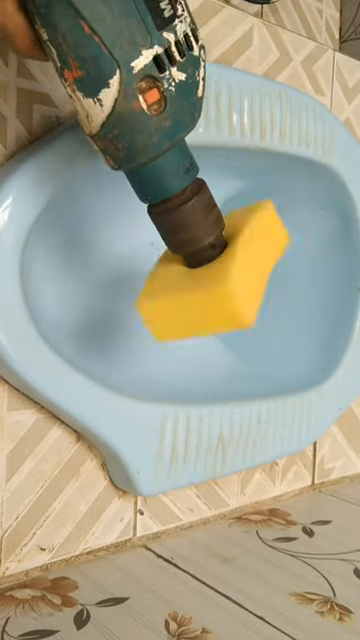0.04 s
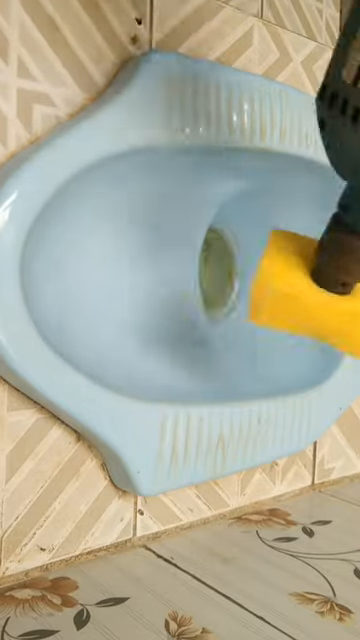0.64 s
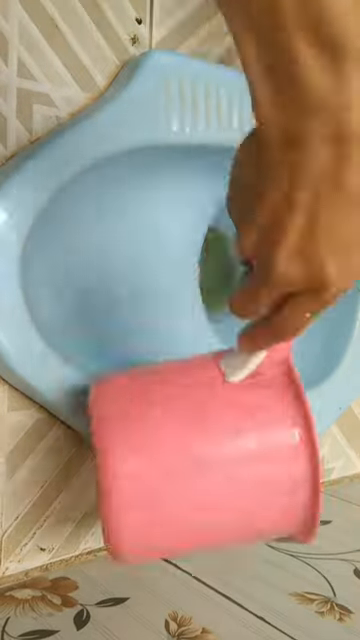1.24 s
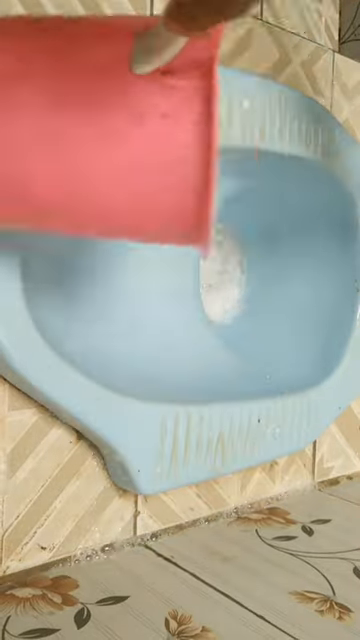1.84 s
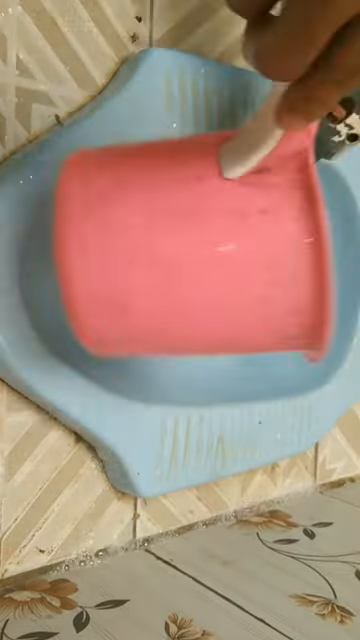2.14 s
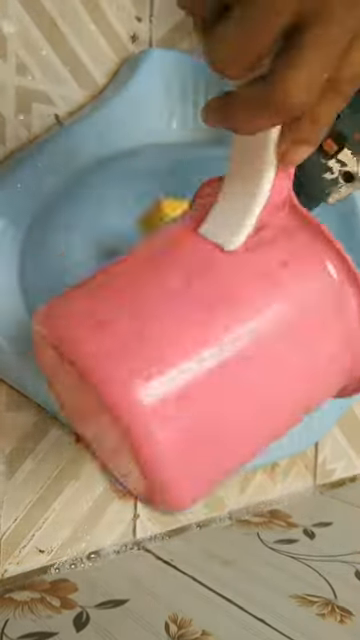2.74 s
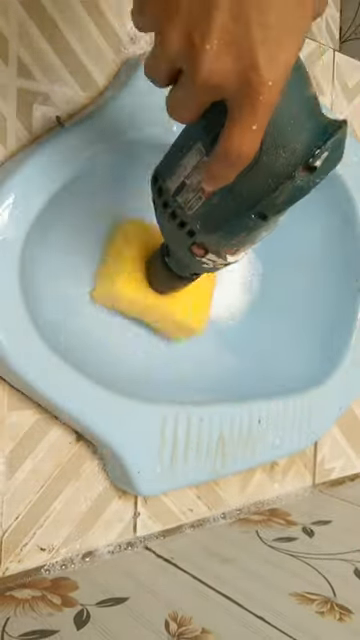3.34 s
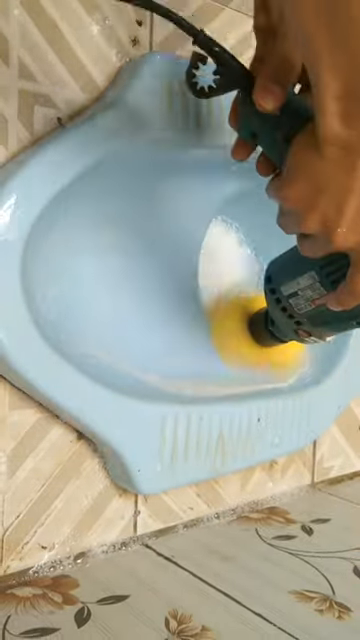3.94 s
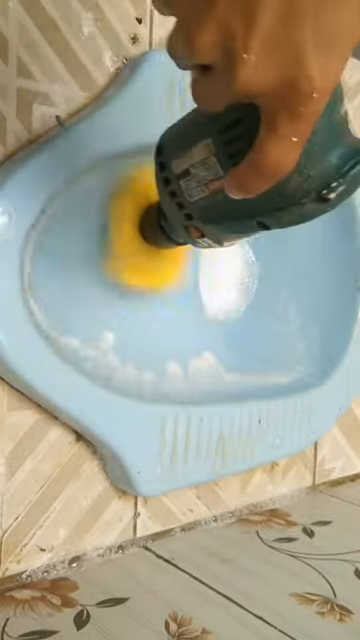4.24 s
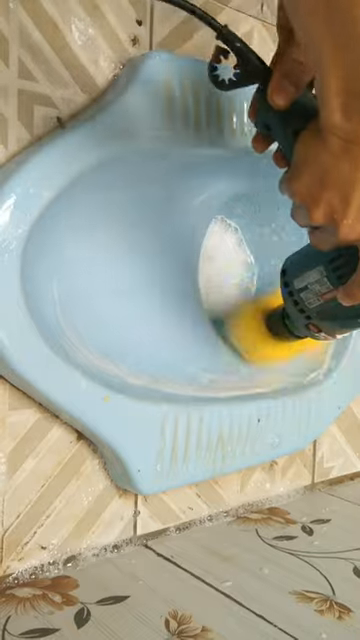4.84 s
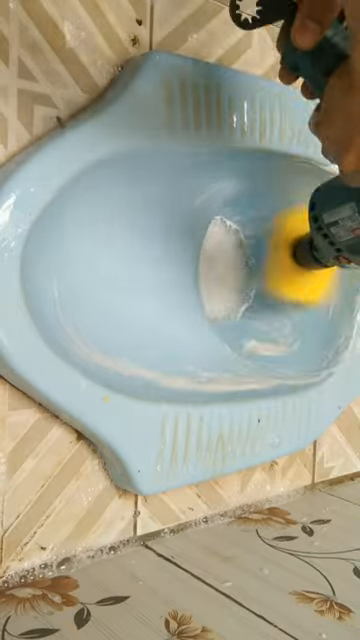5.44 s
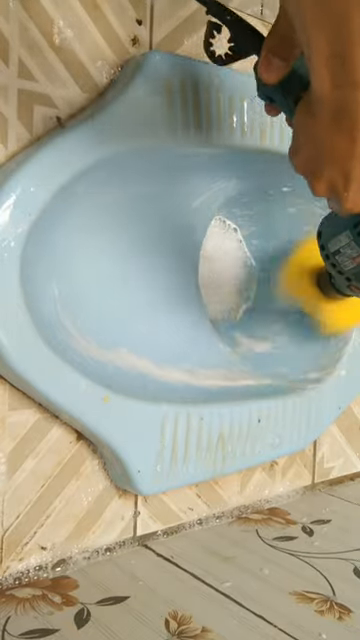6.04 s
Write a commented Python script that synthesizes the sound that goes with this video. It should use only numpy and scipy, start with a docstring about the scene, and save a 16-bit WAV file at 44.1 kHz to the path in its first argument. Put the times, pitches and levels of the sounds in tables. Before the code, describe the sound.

Close up in a small tiled bathroom, an electric drill whirs in brief bursts. A plastic scoop knocks lightly and throws small splashes of water and detergent into a porcelain toilet pan. The drill blips again, then runs continuously with a rattling, hissing whine that wavers in pitch. Its wet sponge rubs the glaze, with a gulp of water, sharp ticks and a few short squeaks.

```python
"""Drill scrubbing a toilet pan

An electric drill with a wet sponge on its chuck scrubs porcelain in a small tiled bathroom.
The trigger is blipped, and a plastic scoop knocks about and throws detergent and water into the pan.
Then the drill runs on: gears rattle and whine, brushes hiss, the sponge rubs and squeaks on the glaze."""
import sys
import numpy as np
from scipy import signal
from scipy.fft import rfft, irfft
from scipy.io import wavfile
from scipy.ndimage import uniform_filter1d

SR = 44100
rng = np.random.default_rng(int(sys.argv[2]) if len(sys.argv) > 2 else 0)


def materialize(psi):
    """Save the field psi as 16-bit PCM at rate SR to the path in sys.argv[1].

    A 1-D psi becomes a single channel; in a 2-D psi each row is a channel.
    """
    bounded = np.clip(np.atleast_2d(psi).T, -1, 1)
    quanta = np.round(bounded * 32767).astype(np.int16)
    wavfile.write(sys.argv[1], SR, quanta)


N = 273420
TIME = np.arange(N) / SR


def amp(db):
    """Decibels to gain."""
    return 10 ** (np.asarray(db) / 20)


def unit(x):
    """Scales to rms 1."""
    return x / np.sqrt(np.mean(x ** 2) + 1e-20)


def level_at(spectrum, hz):
    """Reads a spectrum's level in dB along a log-frequency axis."""
    points_hz, db = np.transpose(spectrum)
    return np.interp(np.log(hz + 1), np.log(points_hz + 1), db)


def add(mix, start, sound):
    """Mixes a sound in at a start time in seconds."""
    part = mix[round(start * SR):][:len(sound)]
    part += sound[:len(part)]


def colour(x, spectrum):
    """Shapes x with an EQ curve that falls away steeply past its ends; rms 1."""
    hz = np.fft.rfftfreq(len(x), 1 / SR) + 1
    skirts = np.minimum(1, hz / spectrum[0][0]) ** 4 * np.minimum(1, spectrum[-1][0] / hz) ** 8
    return unit(irfft(rfft(x) * amp(level_at(spectrum, hz)) * skirts, len(x)))


def wander(rate_hz):
    """Smooth random motion of rms 1, changing up to about rate_hz times a second."""
    hz = np.fft.rfftfreq(N, 1 / SR)[:4096]
    spectrum = rng.standard_normal(len(hz)) + 1j * rng.standard_normal(len(hz))
    return unit(irfft(spectrum * np.exp(-(hz / rate_hz) ** 2), N))


def grains(per_s, spread_db):
    """A random rain of tiny impacts, a few much larger than the rest."""
    size = amp(spread_db * np.minimum(rng.exponential(1, N), 4))
    return unit(size * rng.choice([-1, 1], N) * (rng.random(N) < per_s / SR))


def patchy(x, depth_db):
    """Lets the colour shift in brief patches, as the point of contact moves."""
    frames = signal.stft(x, nperseg=512, noverlap=384)[2]
    patches = uniform_filter1d(rng.standard_normal(frames.shape), size=5, axis=0)
    patches = unit(uniform_filter1d(patches, size=12, axis=1))
    return unit(signal.istft(frames * amp(depth_db * patches), nperseg=512, noverlap=384)[1][:N])


def envelope(start, rise, hold, sag_db_per_s, stop_db_per_s):
    """Rises from a soft start, sags while it is held, then dies quickly."""
    t = TIME - start
    fall_db = sag_db_per_s * np.clip(t - rise, 0, hold) + stop_db_per_s * np.clip(t - rise - hold, 0, 1)
    return np.clip(t / rise, 0, 1) ** 1.33 * amp(-fall_db)


# The room tone's colour. Each row: frequency in Hz, relative level in dB.
RUMBLE_SPECTRUM = [(20, -22), (55, -5), (95, 0), (145, -11), (220, -6), (320, -14), (580, -15), (800, -21),
                   (1150, -35), (3500, -37), (8000, -35), (10000, -48), (16000, -55)]
# Narrow noise bands of a thin ring. Each row: centre in Hz, width in Hz, level in dB before the swell.
RING_BANDS = [(4740, 74, -67), (4930, 67, -75.5), (5100, 100, -77)]
# The ring's slow swell. Each row: time in seconds, gain in dB.
RING_FADER = [(0, -4), (1.1, -3.5), (2.0, 2), (3.2, 0.5)]


def background(rumble_db=-68.5):
    """Low room rumble and a thin, fuzzy high ring."""
    ring = np.zeros(N)
    for hz, width, db in RING_BANDS:
        phase = 2 * np.pi * hz * TIME
        ring += amp(db) * (wander(width) * np.cos(phase) + wander(width) * np.sin(phase))
    swell = amp(np.interp(TIME, *np.transpose(RING_FADER)))
    return ring * swell + amp(rumble_db) * colour(rng.standard_normal(N), RUMBLE_SPECTRUM)


def room(x, t60=0.16, echoes_per_s=3000):
    """Dense, quickly dying reflections from the tiles."""
    t = TIME[:SR // 2]
    echoes = rng.choice([-1, 1], len(t)) * (rng.random(len(t)) < echoes_per_s / SR)
    tail = echoes * (t > .003) * amp(-60 * t / t60)
    return signal.fftconvolve(x, tail / np.linalg.norm(tail))[:N]


# Thumps and hums. Each row: start in seconds, length in seconds, level in dB, pitch in Hz, width in Hz.
THUMP_AND_HUM_CUES = [(0.058, 0.09, -55, 209, 18), (0.061, 0.052, -49.5, 510, 330),
                      (1.244, 0.025, -46, 236, 36), (1.247, 0.041, -53, 586, 31),
                      (2.513, .16, -54, 544, 51), (2.872, 0.041, -45.5, 191, 31),
                      (2.865, 0.07, -38, 577, 28), (2.867, 0.03, -49, 1780, 95),
                      (3.877, 0.091, -42, 633, 87), (3.548, 0.92, -57, 201, 68),
                      (4.271, 0.36, -51, 211, 25), (5.097, 0.19, -56.5, 144, 30),
                      (5.383, 0.31, -52, 442, 32)]


def thumps_and_hums():
    """Low thumps of the scoop and drill, and hums of the rubbed pan: noise held in one resonance."""
    out = np.zeros(N)
    for start, length, db, hz, width in THUMP_AND_HUM_CUES:
        n = int(length * SR)
        pole = np.exp((2j * hz - width) * np.pi / SR)
        drone = signal.lfilter([1], [1, -pole], rng.standard_normal(SR)).real
        drone = colour(drone, [(hz / 2, 0), (hz * 2, 0)])[-n:]
        add(out, start, amp(db) * unit(drone) * signal.windows.tukey(n, .5))
    return out


# Bubbles and gulps. Each row: start in seconds, level in dB, starting pitch in Hz, t60 in seconds.
BUBBLE_CUES = [(1.475, -42, 754, 0.019), (1.642, -33, 784, 0.0077), (1.792, -49.5, 1770, 0.037),
               (3.877, -30, 1370, 0.018), (3.926, -35, 596, 0.051), (3.945, -19.5, 600, 0.019)]


def bubbles(glide=0.97, attack_s=0.00053):
    """Air trapped in the water rings at one slightly rising pitch."""
    out, t = np.zeros(N), TIME[:8192]
    attack = 1 - np.exp(-(t / attack_s) ** 2)
    for start, db, hz, t60 in BUBBLE_CUES:
        tone = np.sin(2 * np.pi * hz * t * (1 + glide * t))
        add(out, start, amp(db - 60 * t / t60) * attack * tone)
    return out


# The hollow ring of a knock. Each row: frequency in Hz, relative level in dB, t60 in seconds.
HOLLOW_MODES = [(235, -12, .07), (285, -7, .06), (345, -8, .05), (441, -1, .05), (630, -8, .05),
                (748, -9, .045), (1384, -14, .026), (1782, -17, .03), (2853, -22, .022), (3262, -24, .018)]
# Knocks of the scoop and drill.
# Each row: start in seconds, strength in dB, pitch factor, contact time in seconds.
KNOCK_CUES = [(1.163, -46.5, 0.96, .002), (1.253, -38.5, 1.05, 0.0013), (1.262, -37.5, 0.93, 0.001),
              (2.144, -26, 0.99, 0.00014), (2.148, -32, 1.21, 0.00014), (2.875, -33.5, 0.83, 0.001),
              (2.889, -35, 1, 0.00051), (3.899, -38, 1.23, 0.00029), (4.7498, -31.5, 2.1, 0.00028)]


def knocks(low_cut_hz=205):
    """A blow rings the hollow modes; a longer contact is duller, and so small a body radiates no bass."""
    out, t = np.zeros(N), TIME[:8192]
    for start, db, pitch, contact in KNOCK_CUES:
        ring = sum(amp(mode_db - 60 * t / t60) * np.sin(2 * np.pi * hz * pitch * t)
                   for hz, mode_db, t60 in HOLLOW_MODES)
        push = np.exp(-2 * np.pi * t / contact) * t
        add(out, start, -amp(db) * signal.fftconvolve(ring, push / push.sum())[:len(t)])
    return signal.sosfilt(signal.butter(4, low_cut_hz, "high", fs=SR, output="sos"), out)


# Sharp ticks. Each row: start in seconds, level in dB, centre in Hz, t60 in seconds.
TICK_CUES = [(0.104, -33, 3000, .015), (0.488, -38, 6200, 0.071), (1.053, -51, 4970, 0.023),
             (1.137, -59, 5950, 0.021), (1.441, -43, 6430, .03), (1.254, -51, 6900, 0.018),
             (1.603, -39, 4740, 0.01), (1.632, -43, 4500, 0.038), (1.791, -41, 7400, 0.012),
             (2.285, -35.5, 5700, 0.023), (2.419, -36, 6000, .04), (2.468, -36.5, 6240, 0.023),
             (4.024, -26, 3500, 0.024), (4.046, -27.5, 4500, 0.071), (4.074, -25, 4000, .03),
             (4.325, -24, 3500, 0.014), (4.484, -25, 4000, .02), (4.7486, -15, 6500, 0.0021),
             (5.485, -31, 1920, 0.055)]


def ticks(half_width_octaves=0.58, top_hz=13000):
    """Drops and grit hit the glaze in short, bright bursts; the longer ones have a softer attack."""
    out, t = np.zeros(N), TIME[:4096]
    hz = np.fft.rfftfreq(len(t), 1 / SR) + 1
    for start, db, centre_hz, t60 in TICK_CUES:
        band = 1 / (1 + (np.log2(hz / centre_hz) / half_width_octaves) ** 4) / (1 + (hz / top_hz) ** 10)
        burst = unit(irfft(rfft(rng.standard_normal(len(t))) * band))
        attack = 1 - np.exp(-t / (.04 * t60))
        add(out, start, amp(db - 60 * t / t60) * attack * burst)
    return out


# Colours of the droplets, finest grains and bulk water. Each row: frequency in Hz, relative level in dB.
SPRAY_SPECTRUM = [(1290, -60), (2200, -2), (3080, 1), (3900, 5), (4860, 3.5), (5150, 2), (7870, 0.5),
                  (13000, -36), (15500, -34)]
FIZZ_SPECTRUM = [(4500, -2), (7800, 3), (10000, -5), (15500, -20)]
SLOSH_SPECTRUM = [(250, -49), (450, -3), (700, -3), (1200, 0), (1800, 2.5), (2600, -1), (3400, -4),
                  (5000, -39)]
# Water and powder thrown by the sponge and the scoop.
# Each row: start, rise and hold in seconds, then spray, slosh and fizz levels in dB.
THROW_CUES = [(0.467, 0.02, 0.18, -51, -58.5, -55), (0.686, 0.013, 0.0064, -59, -54, -71),
              (0.846, 0.027, 0.035, -43.5, -48.5, -53), (0.95, 0.012, 0.049, -65, -73, -71),
              (1.043, 0.025, .015, -62, -58, -76), (1.125, 0.014, 0.0055, -56.5, -63, -67),
              (1.23, 0.029, 0.066, -55.5, -65, -64), (1.415, 0.036, 0.062, -56, -66.5, -63.5),
              (1.588, 0.04, 0.058, -52.5, -61.5, -60), (1.781, 0.019, 0.039, -53, -69, -63),
              (1.919, 0.03, 0.036, -53, -65, -64), (2.067, 0.019, 0.08, -54, -69, -58.5),
              (2.269, 0.018, 0.017, -56, -85.5, -56.5), (2.405, 0.014, 0.048, -55.5, -73.5, -62),
              (2.514, 0.099, .04, -55.5, -53, -69), (2.715, 0.058, 0.062, -58, -73, -61.5)]


def splashes():
    """Each throw thins, then runs out; the low slosh settles sooner than the spray and its fizz."""
    spray = patchy(colour(grains(per_s=2200, spread_db=4.2), SPRAY_SPECTRUM), depth_db=2.6)
    fizz = patchy(colour(grains(per_s=1400, spread_db=4.8), FIZZ_SPECTRUM), depth_db=2.6)
    slosh = patchy(colour(grains(per_s=5000, spread_db=2.5), SLOSH_SPECTRUM), depth_db=1.5)
    out = np.zeros(N)
    for start, rise, hold, spray_db, slosh_db, fizz_db in THROW_CUES:
        droplets = amp(spray_db) * spray + amp(fizz_db) * fizz
        out += droplets * envelope(start, rise, hold, sag_db_per_s=123, stop_db_per_s=401)
        out += amp(slosh_db) * slosh * envelope(start, rise, hold, sag_db_per_s=122, stop_db_per_s=600)
    return out


# The colour of a squeak. Each row: frequency in Hz, relative level in dB.
SQUEAK_SPECTRUM = [(200, -21), (400, 1), (700, -9), (900, -4), (1350, -2), (1900, -0.5), (3000, -2),
                   (4500, -7.5), (7000, -16)]
# Squeaks. Each row: start in seconds, length in seconds, level in dB, first and last slip rate in Hz.
SQUEAK_CUES = [(3.8, .07, -44, 352, 356), (4.505, .07, -35.5, 219, 216), (4.63, .1, -41, 358, 324),
               (5.475, .075, -36.5, 221, 219), (5.6, .075, -37.5, 352, 348), (5.68, .05, -44, 305, 312)]


def squeaks():
    """The sponge sticks and slips on the glaze: short buzzing stacks of harmonics."""
    out, drift = np.zeros(N), .005 * wander(150)
    for start, length, db, first_hz, last_hz in SQUEAK_CUES:
        n = int(length * SR)
        slip_hz = np.linspace(first_hz, last_hz, n) * (1 + drift[int(start * SR):][:n])
        slips = np.cumsum(slip_hz) / SR
        buzz = sum(amp(level_at(SQUEAK_SPECTRUM, k * first_hz)) * np.cos(2 * np.pi * (k * slips + offset))
                   for k, offset in enumerate(.5 * rng.random(size=24), 1))
        add(out, start, amp(db) * unit(buzz) * signal.windows.tukey(n, .5))
    return out


# The colour of the rub. Each row: frequency in Hz, relative level in dB.
RUB_SPECTRUM = [(47, -32), (80, -9), (205, -9), (264, -11.5), (337, -7), (370, -7), (425, -0.5), (472, -3),
                (590, -4.5), (648, -2), (1000, -9), (1300, -8), (2200, -120)]


def sponge_rub():
    """The wet sponge drags over the glaze with a low, grainy noise."""
    return colour(grains(per_s=2500, spread_db=1.8), RUB_SPECTRUM)


# Resonances of the drill's housing. Each row: centre in Hz, width in Hz, lift in dB.
HOUSING_RESONANCES = [(1475, 130, 9), (1310, 60, 4), (1170, 120, -4), (1735, 100, 7), (1920, 100, 3),
                      (2580, 110, 7), (2810, 100, 6), (3870, 170, 7), (4120, 130, 3), (7420, 300, 2),
                      (8300, 300, 5), (11000, 1600, -3)]


def housing_db(hz):
    """The lift that the housing gives a tone at this frequency."""
    return sum(db / (1 + (2 * (hz - centre) / width) ** 2) for centre, width, db in HOUSING_RESONANCES)


def through_housing(noise):
    """Broad noise rings the housing less than a tone does: half the lift in dB."""
    lift = amp(.5 * housing_db(np.fft.rfftfreq(N, 1 / SR)))
    return irfft(rfft(noise) * lift, N)


# The EQ on the brushes. Each row: frequency in Hz, relative level in dB.
BRUSH_SPECTRUM = [(2470, -13), (4200, -2.5), (6430, -7.5), (8360, -7.5), (10200, -21), (11900, -26.5),
                  (14800, -32.5), (15500, -32)]


def brush_hiss(turns, depth=0.033):
    """The brushes spark in a fine hiss that pulses slightly once a turn."""
    pulse = 1 + depth * np.cos(2 * np.pi * turns)
    return colour(through_housing(grains(per_s=14000, spread_db=2.2) * pulse), BRUSH_SPECTRUM)


# The EQ on the gears. Each row: frequency in Hz, relative level in dB.
GEAR_SPECTRUM = [(530, -4), (900, -8), (1100, -6), (1440, -3), (1590, -3), (1710, -1), (2000, -0.5),
                 (2860, 1.5), (3220, 3.5), (3860, -0.5), (4800, -5), (6240, -11.5), (10600, -120)]


def gear_rattle(turns, pinion_teeth=5, depth=0.22):
    """Gear teeth rattle the housing, harder each time a pinion tooth meshes."""
    mesh = 1 + depth * np.cos(2 * np.pi * pinion_teeth * turns)
    return colour(through_housing(grains(per_s=9000, spread_db=2.2) * mesh), GEAR_SPECTRUM)


# Pinion and commutator tones, their beat, and a faint high whistle near 8.3 kHz at cruising speed.
# Each row: multiple of the rotor speed, level in dB against the rattle before housing and speed lifts.
WHINE_ORDERS = [(5, -23), (10, -16.5), (15, -13), (19, -19), (20, -14.5), (24, -13), (25, -12.5), (29, -16),
                (48, -9.5), (60, -19), (72, -24)]


def whine(speed, turns, octaves, db_per_octave=8):
    """The drill's tones swell with speed and as they sweep through the housing's resonances."""
    out = np.zeros(N)
    for order, db in WHINE_ORDERS:
        jitter, flicker_db = .06 * wander(70), 2.2 * wander(25)
        tone = np.sin(2 * np.pi * (order * turns + jitter))
        out += amp(db + housing_db(order * speed) + flicker_db) * tone
    return out * amp(db_per_octave * octaves)


# The sponge is pressed against the pan. Each row: middle and length in seconds, added rub in dB.
PRESS_CUES = [(3.949, 0.15, -45.5), (4.206, 0.18, -52.5), (4.344, 0.21, -48), (4.562, 0.27, -59),
              (4.75, 0.34, -51), (5.05, 0.44, -52.5), (5.567, 1, -68), (6.136, 0.78, -54)]
# Trigger blips, led by a faint, brief rattle that is already dying away at the very start. Each row: start,
# rise and hold in seconds, then rattle and rub levels in dB.
BLIP_CUES = [(0.0, 0.0017, 0.0064, -57, -58), (0.059, 0.06, 0.21, -34, -59),
             (0.325, 0.04, 0.12, -42.5, -58.5), (2.861, 0.069, 0.15, -38.5, -54)]


def drill_faders(octaves, run_start_s=3.252, motor_rise_s=0.17, rub_rise_s=.05):
    """Gains of gears, brushes and sponge: in the long run, noise grows with speed, rub with pressure."""
    running = np.clip((TIME - run_start_s) / motor_rise_s, 0, 1)
    gear_gain = running * amp(-36.5 + 4.5 * octaves)
    brush_gain = running * amp(-37.5 + 12.5 * octaves)
    rub_gain = np.clip((TIME - run_start_s) / rub_rise_s, 0, 1) * amp(-52.5)  # resting lightly
    for middle, length, db in PRESS_CUES:
        add(rub_gain, middle - length / 2, amp(db) * np.hanning(int(length * SR)))
    for start, rise, hold, rattle_db, rub_db in BLIP_CUES:
        blip = envelope(start, rise, hold, sag_db_per_s=61, stop_db_per_s=333)  # coasts, then stops
        gear_gain += amp(rattle_db) * blip
        brush_gain += amp(rattle_db - 5) * blip
        rub_gain += amp(rub_db) * blip
    return gear_gain, brush_gain, rub_gain


# The rotor's speed through the long run. Each row: time in seconds, turns per second.
ROTOR_SPEED = [(3.3, 93), (3.4, 110), (3.6, 126), (3.7, 131), (3.8, 141), (3.87, 142), (4.07, 156),
               (4.15, 153.6), (4.33, 144.6), (4.58, 144), (4.76, 126.6), (4.95, 131.7), (5.08, 140.3),
               (5.2, 133.2), (5.45, 121.3), (5.54, 125), (5.63, 116.4), (5.75, 121.6), (5.85, 115),
               (6.2, 116.6)]


def drill(cruise_turns_per_s=138.7, flutter=.0013, jolt_db=1.0):
    """One rotor drives it all; the sponge's uneven drag flutters the speed and jolts the noise."""
    speed = np.interp(TIME, *np.transpose(ROTOR_SPEED)) * (1 + flutter * wander(60))
    turns = np.cumsum(speed) / SR
    octaves = np.log2(speed / cruise_turns_per_s)  # above cruising speed
    gear_gain, brush_gain, rub_gain = drill_faders(octaves)
    layers = [(gear_rattle(turns), gear_gain), (brush_hiss(turns), brush_gain), (sponge_rub(), rub_gain)]
    noise = sum(patchy(layer, depth_db=2.0) * gain for layer, gain in layers)
    jolts = unit(amp(jolt_db * wander(90)))
    whine_gain = gear_gain * (TIME > ROTOR_SPEED[0][0])  # only the long run whines
    return jolts * noise + whine(speed, turns, octaves) * whine_gain


def scene():
    """Everything up close in mono, with the bright sounds sent harder to the tiled room."""
    bright = drill() + squeaks() + splashes() + ticks()
    dull = knocks() + bubbles() + thumps_and_hums()
    reflections = room(amp(-12) * bright + amp(-20.5) * dull)
    return (bright + dull + reflections + background())[None]


def record(dry):
    """A steep low-pass at 15.6 kHz trims the very top."""
    low_pass = signal.firwin(511, 15600, window=("kaiser", 9), fs=SR)
    return signal.oaconvolve(dry, low_pass[None], "same")


dry = scene()
out = record(dry)
materialize(out)
```